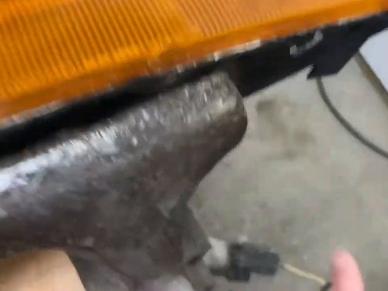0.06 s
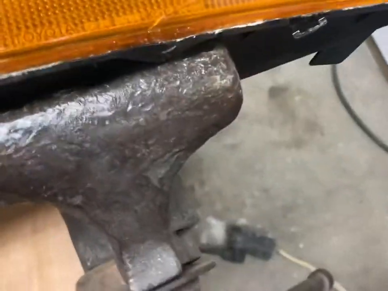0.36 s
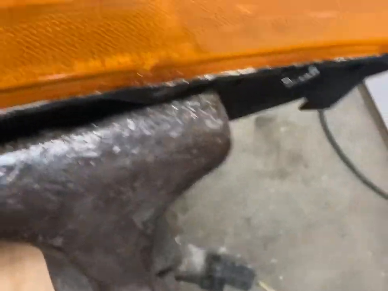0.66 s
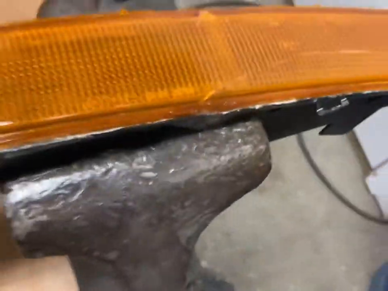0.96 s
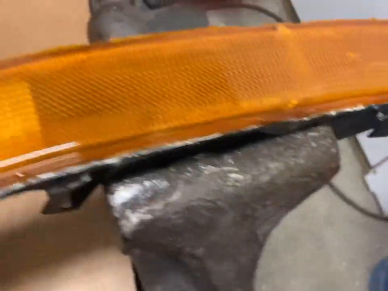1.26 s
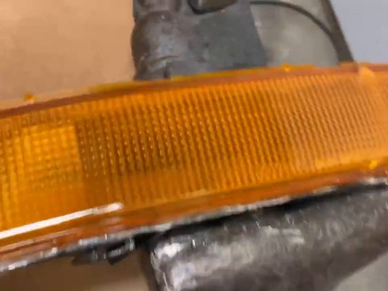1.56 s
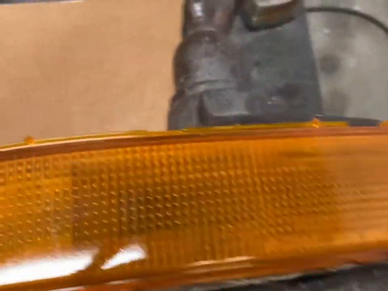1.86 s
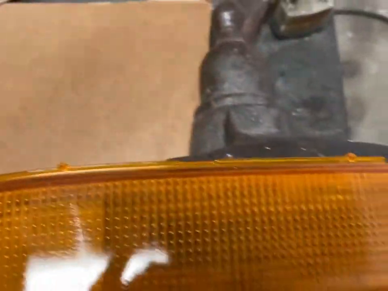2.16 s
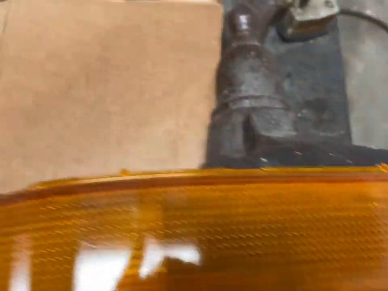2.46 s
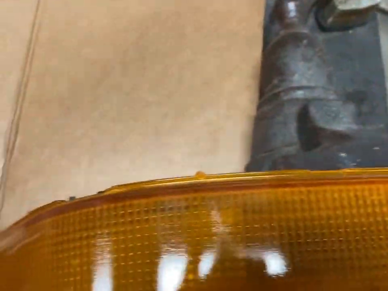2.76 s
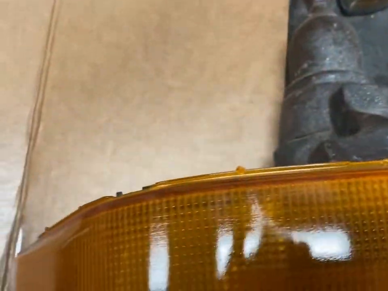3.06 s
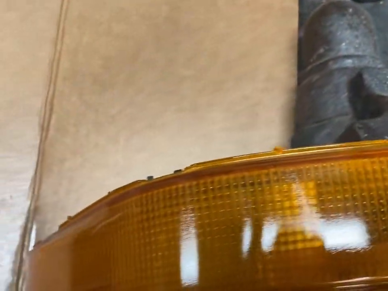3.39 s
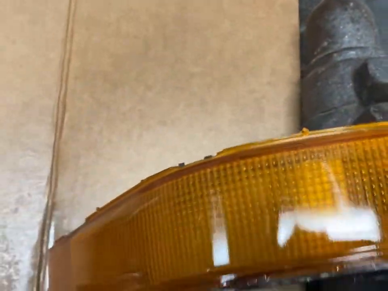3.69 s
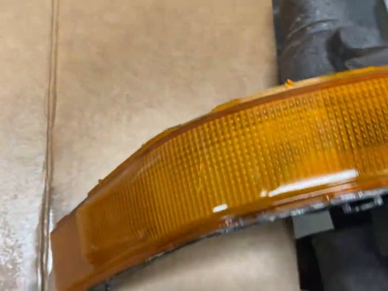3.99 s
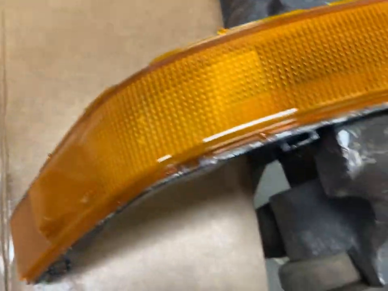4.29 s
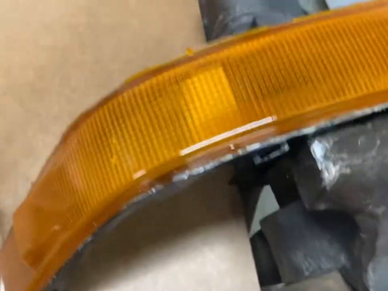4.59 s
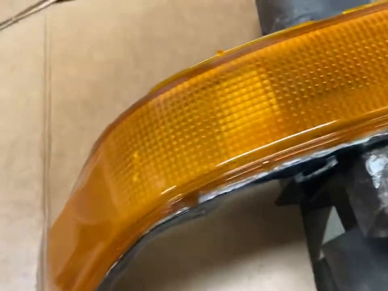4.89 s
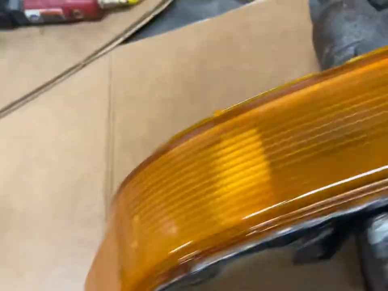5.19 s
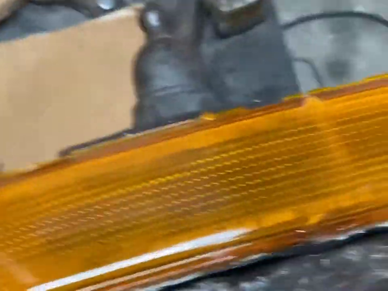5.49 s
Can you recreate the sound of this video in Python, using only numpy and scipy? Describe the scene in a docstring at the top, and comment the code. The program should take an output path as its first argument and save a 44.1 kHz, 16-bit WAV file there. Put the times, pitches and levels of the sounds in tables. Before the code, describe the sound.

A steady low hum of machinery and ventilation fills a workshop. A hand briefly rubs close to the microphone. Then a hollow plastic lamp housing is shifted on an iron vice: a few light taps, a cluster of louder dull knocks near the middle, and then short scrapes, faint squeaks and a sharp click. After a lull, more taps and a low drag come at the end.

```python
"""A workshop humming with machinery, where a hollow plastic lamp housing is shifted about on an iron vice.
Impacts excite damped modes of the shell, rim and vice: taps, clicks and knocks that shake the bench.
Stick-slip friction of plastic on iron makes scrapes, squeaks and squeals, and a hand slides and brushes
close to a pair of microphone ports, over mains hum, faint machinery whines and ventilation rumble."""
import sys
import numpy as np
from scipy import signal
from scipy.fft import rfft, irfft, next_fast_len
from scipy.io import wavfile
from scipy.ndimage import uniform_filter1d

SR = 44100
rng = np.random.default_rng(int(sys.argv[2]) if len(sys.argv) > 2 else 0)


def transcribe(u):
    """Save the signal u as a 16-bit wav file named by the first command-line argument.

    u: samples, shape (n,) or (channels, n), limited to [-1, 1]; the rate is SR.
    q: integer samples, one column per channel.
    """
    v = np.clip(np.atleast_2d(u).T, -1, 1)
    q = np.round(v * 32767).astype(np.int16)
    wavfile.write(sys.argv[1], SR, q)


N = 249165
TIME = np.arange(N) / SR
SIZE = next_fast_len(N, True)
FREQS = np.maximum(np.arange(SIZE // 2 + 1) * SR / SIZE, 1)


def from_db(db):
    """Decibels to amplitude ratio."""
    return np.exp(np.asarray(db) * (np.log(10) / 20))


def rms_one(x):
    """Normalisation to unit power."""
    return x / np.sqrt(np.mean(x ** 2) + 1e-20)


def over_hz(points):
    """Interpolation of (frequency_hz, value) rows over log frequency."""
    hz, value = np.transpose(points)
    return np.interp(np.log(FREQS), np.log(hz), value)


def noise(colour):
    """Spectral shaping: unit-power noise coloured by (frequency_hz, density_db) rows."""
    return rms_one(irfft(rfft(rng.standard_normal(SIZE)) * from_db(over_hz(colour)))[:N])


def drift(rate_hz):
    """Band-limited random modulation with a spread of about 1."""
    knots = rng.standard_normal(N // 32)
    return 1.2 * np.interp(TIME * min(2 * rate_hz, SR / 33), np.arange(len(knots)), knots)


def friction(colour, grain_db, grain_hz):
    """Friction noise: countless small stick-slips add up to coloured noise that flutters."""
    return rms_one(noise(colour) * from_db(grain_db * drift(grain_hz)))


def grit(per_s, size_db, t60):
    """Surface roughness: the gain of a steady rub with random, decaying jolts."""
    jolts = (rng.random(N) < per_s / SR) * rng.exponential(1, N) * from_db(2 * size_db)
    jolt_power = signal.lfilter([1], [1, -from_db(-120 / (t60 * SR))], jolts + 1e-18)
    return rms_one(np.sqrt(1 + jolt_power))


def resonance(hz, width_hz):
    """Forced resonance: unit-power noise in one band with steep skirts."""
    radii = np.exp(-np.pi * width_hz * np.array([1, 6]) / SR)
    angle = 2 * np.pi * hz / SR
    sections = [[1, 0, -1, 1, -2 * r * np.cos(angle), r * r] for r in radii]
    return rms_one(signal.sosfilt(sections, rng.random(N) - .5))


def strokes(events, rise_share, roundness):
    """Rubbing envelope: each stroke stays within 10 dB of its peak for its length; roundness 2 is a bell."""
    power, t = 1e-14, TIME[::16]
    for peak_s, db, length_s in events:
        away = np.maximum((peak_s - t) / rise_share, (t - peak_s) / (1 - rise_share)) / length_s
        power = power + from_db(db - 10 * np.minimum(away, 10) ** roundness) ** 2
    return np.interp(TIME, t, np.sqrt(power))


def swell(start_s, length_s, hz=0, wobble=0.0):
    """Half-sine envelope, carrying a wavering tone if a pitch is given."""
    out, t = np.zeros(N), TIME[:int(length_s * SR)]
    at = int(start_s * SR)
    cycles = np.cumsum(hz * (1 + wobble * drift(35)[:len(t)])) / SR
    out[at:at + len(t)] = (np.sin(np.pi * t / length_s) * np.cos(2 * np.pi * cycles))[:N - at]
    return out


def decays(events, t60):
    """Exponential decay: an envelope that jumps at each event and dies away."""
    kicks = np.full(N, 1e-18)
    for start_s, db, *_ in events:
        kicks[int(start_s * SR)] = from_db(2 * db)
    return np.sqrt(signal.lfilter([1], [1, -from_db(-120 / (t60 * SR))], kicks))


def blows(events, modes, trim_db, edge_hz, edge_t60, snap_db, snap_t60, lag_cycles, scatter_db, damping):
    """Modal impact: damped modes ring after a bright snap and a duller edge; soft contact loses treble."""
    out, t = np.zeros(N + SR), TIME[:SR // 3]
    hz, mode_db, t60 = np.transpose(modes)[:, :, None]
    age = np.maximum(t - lag_cycles / hz, 0)  # bending waves: low notes arrive later
    rings = np.sin(2 * np.pi * hz * age) * from_db(-60 * age / t60)
    rings[::2] *= -1
    edge_band = signal.butter(2, [125, edge_hz], "band", fs=SR)
    hardest_db = max(row[1] for row in events)
    for start_s, level_db, edge_db, cutoff_hz in events:
        body = from_db(mode_db[:, 0] + scatter_db * rng.standard_normal(len(hz))) @ rings
        body *= np.exp(-damping * (hardest_db - level_db) * t)  # a light touch stays on and damps
        body /= np.sqrt(uniform_filter1d(body ** 2, size=256).max())
        edge = rms_one(signal.lfilter(*edge_band, rng.standard_normal(len(t))))
        edge *= from_db(-60 * t / edge_t60)
        snap = rng.standard_normal(len(t)) * from_db(snap_db - 60 * t / snap_t60)
        blow = from_db(level_db + trim_db) * (body + from_db(edge_db) * (edge + snap))
        at = int(start_s * SR)
        out[at:at + len(t)] += signal.lfilter(*signal.butter(2, cutoff_hz, fs=SR), blow + 1e-18)
    return out[:N]


# machinery tones: pitch_hz, level_db
HUM_LINES = [(59.6, -43), (119.9, -40), (199.8, -45.5), (239.7, -52), (1217, -69.5), (1545, -72.5)]
def hum(waver_db=1.63, wander_rad=0.39):
    """Line spectrum of mains and motors, slightly modulated in level and phase."""
    out = 0
    for hz, db in HUM_LINES:
        amplitude = np.sqrt(2) * from_db(db + waver_db * drift(5.3))
        phase = 2 * np.pi * (hz * TIME + rng.random()) + wander_rad * drift(0.84)
        out = out + amplitude * np.sin(phase)
    return out


# ventilation spectrum: frequency_hz, density_db
AIR_COLOUR = [(22, -20), (36, -10.5), (52, 5.5), (70, 2), (100, 1), (170, -4.5), (205, 1), (255, -0.5),
              (320, -14.5), (700, -28), (2000, -33.5), (3500, -40), (6000, -49.5), (11000, -54),
              (16000, -50)]
def ventilation(level_db=-37.5):
    """Broadband flow noise: the steady rumble and hiss of moving air."""
    return from_db(level_db) * noise(AIR_COLOUR)


# slides of the hand: peak_s, level_db, length_s
SLIDES = [(.125, -49, 0.16), (.24, -38, 0.19), (.305, -39, 0.16), (.39, -50.5, 0.13), (.685, -58.5, 0.12),
          (1.35, -58, 0.13), (5.08, -48.5, 0.11), (5.29, -57, 0.2)]
# slips of the grip: start_s, level_db, length_s
SLIPS = [(2.574, -42, 0.026), (3.012, -34, 0.028), (3.022, -36, 0.041)]
# sliding spectrum: frequency_hz, density_db
SLIDE_COLOUR = [(150, -25), (300, 4), (600, 5), (1300, 2), (2000, 0.5), (3000, -0.5), (3900, 3), (5500, -3),
                (7000, 0), (9500, 3), (16000, -3)]
def hand_slides():
    """Sliding friction of skin near the ports, in long strokes and brief slips."""
    sliding = from_db(7) * strokes(SLIDES, rise_share=0.55, roundness=1.25)
    slipping = sum(from_db(db) * swell(start_s, length_s) for start_s, db, length_s in SLIPS)
    return (sliding + slipping) * friction(SLIDE_COLOUR, grain_db=1.24, grain_hz=210)


# drags of the skin: peak_s, level_db, length_s
SCUFFS = [(.095, -38.5, 0.023), (.135, -38, 0.028), (.18, -37, 0.042), (.215, -37, 0.056),
          (.28, -43.5, 0.058), (.385, -40, 0.051)]
# scuffing spectrum: frequency_hz, density_db
SCUFF_COLOUR = [(120, -25), (300, 5), (600, -5), (1200, -7.5), (2200, -15), (8000, -53)]
def skin_scuffs():
    """Uneven friction: dragging skin trips over rough spots in low scuffs."""
    envelope = from_db(4) * strokes(SCUFFS, rise_share=0.38, roundness=0.89)
    rub = friction(SCUFF_COLOUR, grain_db=0.5, grain_hz=130)
    return envelope * rub * grit(per_s=85, size_db=6, t60=0.017)


# catches of the skin: peak_s, level_db, length_s
CATCHES = [(.205, -41, 0.011), (.25, -42, 0.031), (.32, -36.5, 0.078)]
def skin_catches():
    """Stick-slip of skin: a bright rasp of fluttering narrow-band noise."""
    rasp = rms_one(resonance(hz=3120, width_hz=1100) * from_db(3 * drift(200)))
    return strokes(CATCHES, rise_share=0.49, roundness=1.5) * rasp


# light finger strokes: peak_s, level_db, length_s
BRUSHES = [(.52, -55, 0.18), (.685, -56.5, 0.12), (.86, -56.5, 0.2), (1.22, -55.5, 0.44),
           (1.36, -53, 0.095), (1.73, -46, 0.49), (2.21, -54, 0.17), (2.35, -59, 0.17), (2.63, -58, 0.11),
           (2.91, -45.5, 0.34), (3.37, -57.5, 0.25), (3.65, -54.5, 0.41), (4.25, -57.5, 0.8),
           (4.58, -55, 0.32), (5.15, -65.5, 1)]
# brushing spectrum: frequency_hz, density_db
BRUSH_COLOUR = [(1000, -3.5), (2000, -2.5), (5200, -9.5), (7000, -5), (9800, 0), (13000, -6.5),
                (16000, -10.5)]
def finger_brushes():
    """Light friction: fingers hiss softly over the shell."""
    hiss = friction(BRUSH_COLOUR, grain_db=0.95, grain_hz=32)
    return strokes(BRUSHES, rise_share=0.44, roundness=2.07) * hiss


# light blows on the shell: start_s, level_db, edge_db, cutoff_hz
TAPS = [(.610, -42.5, 1, 3500), (1.491, -42, -3, 2500), (1.545, -41, -6, 1500), (1.764, -31, -18, 2000),
        (1.7865, -22, -7, 2200), (1.802, -14, -2.5, 6000), (1.807, -16, -31, 3530), (1.815, -23, -14, 4000),
        (1.988, -33.5, -15, 3500), (2.021, -31, -8, 2980), (2.195, -33, -4, 3000),
        (2.447, -32.5, -12, 1600), (2.572, -34, 2, 2200), (2.612, -25.5, -16, 1090),
        (3.384, -33, -5.5, 1590), (3.739, -32, 0, 3000), (3.897, -27.5, 5, 3000), (5.408, -46, -5, 1100),
        (5.451, -40.5, -2, 1500), (5.501, -41, -12, 2200), (5.527, -23, -22, 1300),
        (5.633, -27.5, -18, 1800)]
# shell modes: pitch_hz, level_db, t60_s
TAP_MODES = [(236.5, -1, 0.097), (268, 3.5, 0.058), (333, 3, 0.069), (450, 0, 0.053), (617, -2.5, 0.057),
             (703, -8.5, 0.081), (879, 2.5, 0.032), (1110, -4, 0.04), (1460, 0, 0.027), (1596, -1.5, 0.03),
             (1767, -6.5, 0.053), (1920, -5, 0.046), (2096, -6, 0.051), (2557, -19, 0.11),
             (3210, -13.5, 0.061)]
def taps():
    """Contact damping: the lighter the tap, the sooner the shell's modes die."""
    return blows(TAPS, TAP_MODES, trim_db=-5, edge_hz=1600, edge_t60=0.056,
                 snap_db=-36, snap_t60=0.012, lag_cycles=0.64, scatter_db=3.5, damping=3.7)


# four machinery whines, then squeaks and groans of plastic: start_s, level_db, length_s, pitch_hz
WHINES_AND_SQUEAKS = [(0.635, -58, 0.25, 1559), (.81, -55, 0.083, 1200), (0.88, -59, 0.31, 1254),
                      (1.151, -56.5, 0.17, 1210), (1.785, -19, 0.028, 878), (1.85, -45, 0.035, 1650),
                      (2.8, -49, 0.35, 1444), (3.039, -26, 0.055, 390), (3.507, -43, 0.075, 940),
                      (3.788, -37, 0.077, 1381), (3.924, -40, 0.035, 1476), (5.54, -22.5, 0.047, 249.3)]
def whines_and_squeaks():
    """Modulated tones: faint machinery whines swell and fade; later, stick-slip makes the plastic squeak."""
    return sum(from_db(db) * swell(start_s, length_s, hz, wobble=0.0085)
               for start_s, db, length_s, hz in WHINES_AND_SQUEAKS)


# pushes over the iron: peak_s, level_db, length_s
SCRAPES = [(.86, -55, 0.062), (1.245, -51, 0.059), (1.345, -49.5, 0.096), (1.81, -43, 0.26),
           (2.32, -56.5, 0.3), (2.65, -55, 0.27), (2.9, -49.5, 0.34), (3.05, -36, 0.031), (3.55, -41, 0.15),
           (3.66, -44, 0.17), (3.765, -39, 0.043), (3.81, -40, 0.078), (3.935, -42, 0.13)]
# resonances of the rubbed shell: pitch_hz, width_hz, level_db
SHELL_BANDS = [(211, 55, 5), (300, 116, -0.5), (556, 58, -2.5), (982, 80, -5), (1190, 86, -2),
               (1334, 70, -2), (1513, 110, 0), (1750, 240, -2.5), (2040, 92, -5), (2220, 79, -12),
               (2610, 88, -13), (3380, 270, -15)]
def scrapes(shift_db=3.5, shift_hz=14):
    """Forced vibration: the shell grates on iron, favouring other resonances as the contact moves."""
    shell = rms_one(sum(from_db(db + shift_db * drift(shift_hz)) * resonance(hz, width_hz)
                        for hz, width_hz, db in SHELL_BANDS))
    pushed = from_db(4.5) * strokes(SCRAPES, rise_share=0.33, roundness=1.63)
    skidding = from_db(-19.5) * decays(TAPS + CLICKS, t60=0.33)
    return np.hypot(pushed, skidding) * shell * grit(per_s=110, size_db=1.5, t60=0.014)


# tiny ticks: start_s, level_db
TICKS = [(1.962, -41), (1.987, -33.5), (2.058, -50), (2.237, -36.5), (2.581, -36), (2.752, -37),
         (2.768, -38), (3.049, -23), (4.381, -41), (5.394, -55)]
# tick spectrum: frequency_hz, density_db
TICK_COLOUR = [(600, 3), (2000, 7), (5000, -19), (9500, 24), (16000, -26)]
def plastic_ticks():
    """Transients: the gripped plastic gives off bright, fast-decaying bursts of noise."""
    return decays(TICKS, t60=0.038) * noise(TICK_COLOUR)


# the rim catching on iron: start_s, level_db, edge_db, cutoff_hz
CLICKS = [(2.059, -43, -5, 8000), (2.103, -47, -9, 8000), (2.304, -45, -5, 3000), (2.584, -27, -17, 2000),
          (2.8204, -14, -1, 14000), (2.825, -27.5, -19, 5000), (3.791, -40, -8, 4000),
          (3.8, -25.5, -2, 2600), (3.894, -29, -4, 4460), (3.901, -17, 8, 3250), (3.908, -26.5, -15, 2980),
          (3.944, -34, -15, 2200), (5.394, -42, -6, 5000), (5.5505, -31.5, 1, 9000)]
# rim modes: pitch_hz, level_db, t60_s
CLICK_MODES = [(409.5, -1, 0.13), (530, -0.5, 0.065), (900, -4, 0.09), (1258, 0, 0.12), (1343, -10, 0.14),
               (1486, 0, 0.071), (1820, -3, 0.035), (2054, 2, 0.05), (2570, 0, 0.083), (2657, -4.5, 0.046),
               (3220, -11, 0.04), (4245, 5.5, 0.016), (4380, -8.5, 0.12), (5010, 4.5, 0.015),
               (5520, 2.5, 0.03), (6340, 0.5, 0.054), (8620, 5, 0.03), (11200, 0, 0.025)]
def rim_clicks():
    """Hard impact: a brief contact excites the rim's modes far into the treble."""
    return blows(CLICKS, CLICK_MODES, trim_db=-8.5, edge_hz=5100, edge_t60=0.018,
                 snap_db=-18, snap_t60=0.0072, lag_cycles=1.96, scatter_db=2.5, damping=0.3)


# short catches of the rim: peak_s, level_db, length_s
SQUEALS = [(2.56, -59, 0.033), (3.44, -70, 0.16), (3.55, -52.5, 0.1), (3.63, -51, 0.1), (3.71, -55, 0.085),
           (3.79, -54.5, 0.04), (3.94, -71, 0.062)]
# notes of the rubbed rim: pitch_hz, width_hz, level_db, growth_db_per_db, glide_share
RIM_NOTES = [(2640, 98, 1, 1.2, 0.5), (4303, 51, 4, 1, 0.95), (6405, 70, -1, 0.34, 0.69),
             (8640, 74, 5, 0.8, 0.58), (11250, 60, -4, 0.5, .3), (14280, 81, -5, 1.2, .3)]
# glide as the contact travels along the rim: time_s, pitch_ratio
RIM_GLIDE = [(2.55, 0.99), (3.3, 1.015), (3.52, 1.01), (3.57, 1), (3.63, 1), (3.72, .99), (3.8, 0.99),
             (3.9, 1.05)]
def rim_squeals(reference_db=-53, wobble=0.0022, flutter_db=1.5, flutter_hz=45):
    """Stick-slip on iron: the rim's notes glide together and flutter separately, over a rasp."""
    pitch_offset = np.interp(TIME, *np.transpose(RIM_GLIDE)) - 1 + wobble * drift(25)
    ahead_s = np.cumsum(pitch_offset) / SR  # reading a note faster raises its pitch
    effort = strokes(SQUEALS, rise_share=0.59, roundness=1.96) / from_db(reference_db)
    rasp = grit(per_s=170, size_db=2, t60=0.0069) * resonance(hz=2520, width_hz=900)
    out = from_db(reference_db + 1) * effort * rasp
    for hz, width_hz, db, growth, glide_share in RIM_NOTES:
        note = np.interp(TIME + glide_share * ahead_s, TIME, resonance(hz, width_hz))
        out += from_db(reference_db + db + flutter_db * drift(flutter_hz)) * effort ** growth * note
    return out


# dull blows on the vice: start_s, level_db, edge_db, cutoff_hz
KNOCKS = [(2.7438, -3.5, -0.5, 8000), (3.037, -17, 0, 3000), (3.047, -13.5, -24, 3000),
          (3.062, -17.5, -24, 2000), (3.094, -14.5, -10, 3000), (3.145, -11.5, -2.5, 9100),
          (5.551, -26.5, 9.5, 9000)]
# modes of housing and vice: pitch_hz, level_db, t60_s
KNOCK_MODES = [(119.6, 7.5, 0.23), (140.7, -0.5, 0.056), (172, 4, 0.23), (301, -1, 0.16),
               (385.3, -3.5, 0.12), (434, -2, 0.053), (520, -8, 0.055), (605, -10, 0.11), (773, -12, 0.076),
               (917, -13, 0.097), (1160, -20.5, 0.13), (1340, -22.5, 0.42), (1810, -18, 0.12),
               (2000, -21, 0.1), (2680, -23, 0.035)]
def knocks():
    """Free vibration: housing and vice ring in their low modes after each blow."""
    return blows(KNOCKS, KNOCK_MODES, trim_db=-6.5, edge_hz=790, edge_t60=0.047,
                 snap_db=-20.5, snap_t60=0.027, lag_cycles=0.9, scatter_db=2.5, damping=0.29)


def bending_waves(trim_db=-7, start_hz=1000, end_hz=135, fall_s=0.00306, peak_s=0.0053):
    """Dispersion: each knock's bending wave brings its high notes first, so the pitch drops fast."""
    out, t = np.zeros(N + SR), TIME[:SR // 10]
    hz = end_hz + (start_hz - end_hz) * np.exp(-t / fall_s)
    envelope = t / peak_s * np.exp(1 - t / peak_s)
    chirp = envelope * np.sin(2 * np.pi * np.cumsum(hz) / SR)
    for start_s, level_db, *_ in KNOCKS:
        at = int(start_s * SR)
        out[at:at + len(t)] -= from_db(level_db + trim_db) * chirp
    return out[:N]


# workbench spectrum: frequency_hz, density_db
BENCH_COLOUR = [(30, -37), (55, 5), (95, 3.5), (170, 3), (260, -5.5), (420, -12), (800, -36), (3000, -64)]
def bench_shudder():
    """Structure-borne sound: every knock sets off a slowly dying rumble in the bench."""
    return from_db(-16.5) * decays(KNOCKS, t60=0.64) * noise(BENCH_COLOUR)


# level curve of the drag: time_s, level_db
DRAG_LEVEL = [(5.52, -68), (5.535, -37.5), (5.58, -39.5), (5.61, -30.5), (5.65, -26.5)]
# drag spectrum: frequency_hz, density_db
DRAG_COLOUR = [(150, -28), (250, 4), (400, -9), (500, 6), (700, 2.5), (900, -6.5), (2000, -10), (3200, -25),
               (9000, -25), (16000, -33)]
def housing_drag():
    """Sliding friction: a low rub swells as the housing is dragged round."""
    level_db = np.interp(TIME, *np.transpose(DRAG_LEVEL), left=-120, right=-120)
    return from_db(level_db) * friction(DRAG_COLOUR, grain_db=1.5, grain_hz=130)


# likeness of spread-out sound at the two ports: frequency_hz, coherence (capped at 1)
PORT_COHERENCE = [(60, 0.96), (300, 0.96), (700, 0.7), (1400, 0.55), (3000, 0.25), (5000, 0.5), (7000, 0.8),
                  (16000, 1.65)]
# phase of left against right: frequency_hz, lead_rad
PORT_LEAD = [(100, -.1), (400, .3), (1000, .8), (2000, 2.2), (3200, 1.2), (4400, -.2), (5400, -3.3),
             (6600, -6.2), (7500, -6.4), (8800, -9.3), (9500, -9.5), (10900, -12.5), (12000, -12.7),
             (13200, -15.6), (14200, -15.8), (15200, -18.8)]
# level difference of sound from the left: frequency_hz, left_minus_right_db
LEFT_TILT = [(300, 0.5), (640, 2.5), (1410, 6.5), (4400, 5), (7000, 0)]
def ports(direct, spread, tilt_db=0, scatter_t60=0.13):
    """Path difference: two ports differ in phase and level; scattering decorrelates spread-out sound."""
    t = TIME[:SR // 8]
    paths = rng.standard_normal(len(t)) * from_db(-60 * t / scatter_t60)
    scatter = np.exp(1j * np.angle(rfft(paths, SIZE)))
    coherence = np.clip(over_hz(PORT_COHERENCE), 0, 1)
    common = np.sqrt((1 + coherence) / 2) * rfft(direct + spread, SIZE)
    opposed = np.sqrt((1 - coherence) / 2) * scatter * rfft(spread, SIZE)
    sides = np.array([[1], [-1]])
    response = from_db(sides * tilt_db / 2) * np.exp(.5j * sides * over_hz(PORT_LEAD))
    return irfft((common + sides * opposed) * response)[:, :N]


def room(x, t60=0.16, gain_db=-7):
    """Reverberation: diffuse mid-range reflections, a different set on each side."""
    t = TIME[:SR // 2]
    tails = rng.standard_normal((2, len(t))) * from_db(-60 * t / t60) * (t > .006)
    tails /= np.sqrt((tails ** 2).sum(1, keepdims=True))
    tails = signal.sosfilt(signal.butter(1, [250, 4500], "band", fs=SR, output="sos"), tails)
    return from_db(gain_db) * signal.fftconvolve(x[None], tails)[:, :N]


def scene():
    """Superposition: housing and whines to the left, room behind; hum, bench, air and hand in the middle."""
    low_cut = signal.butter(2, 75, "high", fs=SR, output="sos")  # impacts and tones carry little deep bass
    impacts = knocks() + bending_waves() + taps() + rim_clicks()
    direct = signal.sosfilt(low_cut, impacts + whines_and_squeaks())
    rubbing = scrapes() + housing_drag() + rim_squeals()
    from_left = ports(direct, rubbing, over_hz(LEFT_TILT))
    reflections = room(direct)
    hum_and_bench = hum() + bench_shudder()
    air = ventilation()
    hand = hand_slides() + skin_scuffs() + skin_catches() + finger_brushes() + plastic_ticks()
    return from_left + reflections + ports(hum_and_bench, air + hand)


def record(dry, cutoff_hz=15900):
    """Band limiting: an elliptic low-pass cuts the top steeply."""
    return signal.sosfilt(signal.ellip(10, .1, 90, cutoff_hz, fs=SR, output="sos"), dry)


dry = scene()
out = record(dry)
transcribe(out)
```